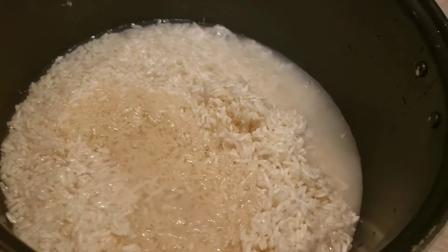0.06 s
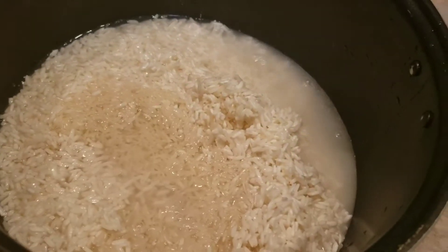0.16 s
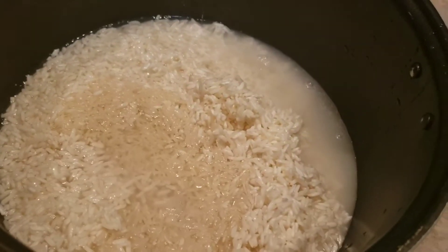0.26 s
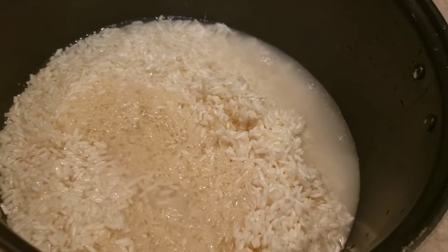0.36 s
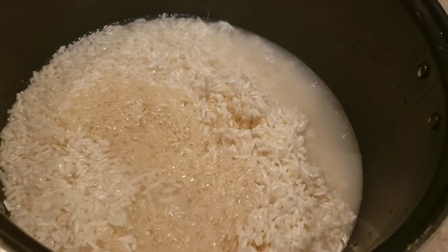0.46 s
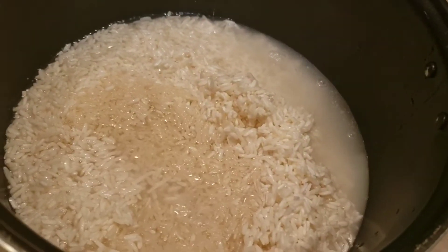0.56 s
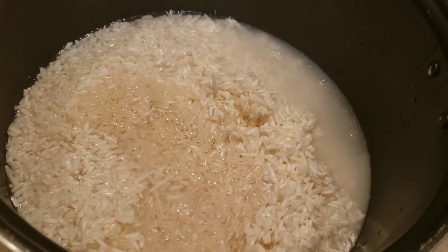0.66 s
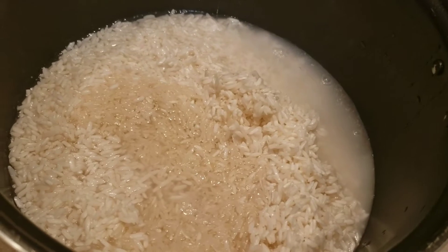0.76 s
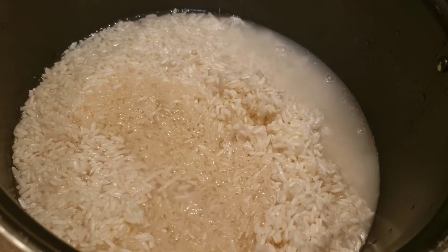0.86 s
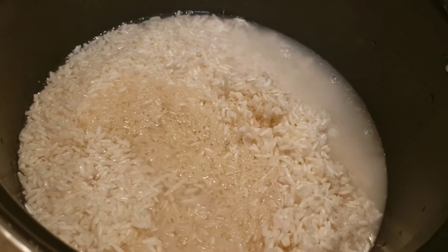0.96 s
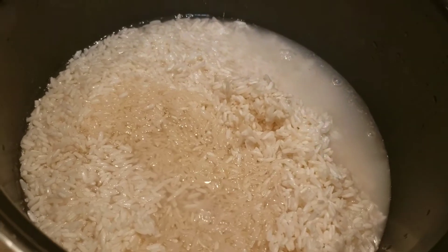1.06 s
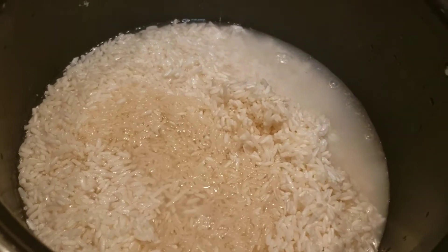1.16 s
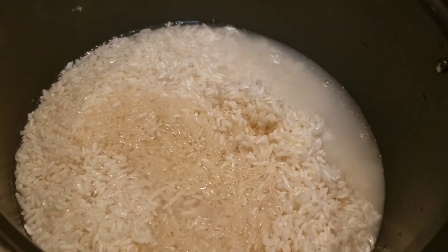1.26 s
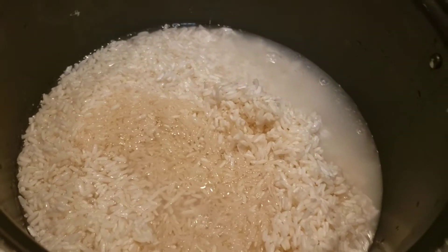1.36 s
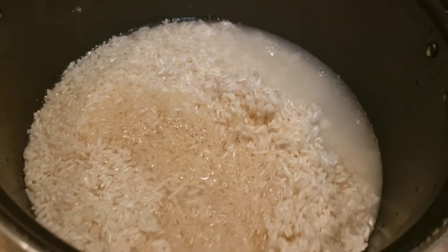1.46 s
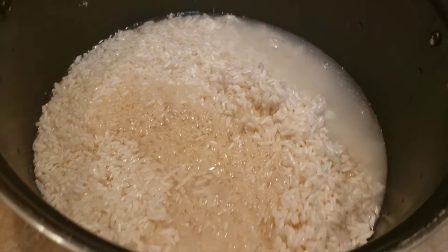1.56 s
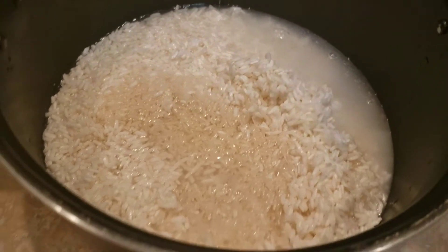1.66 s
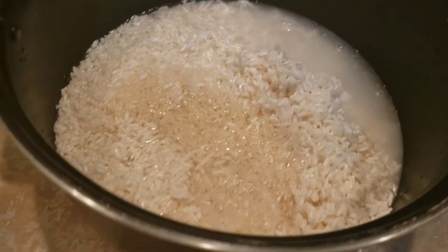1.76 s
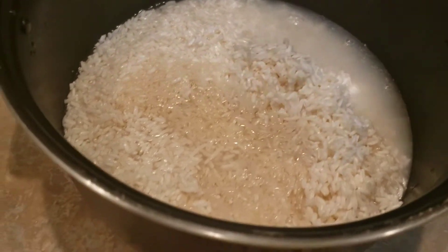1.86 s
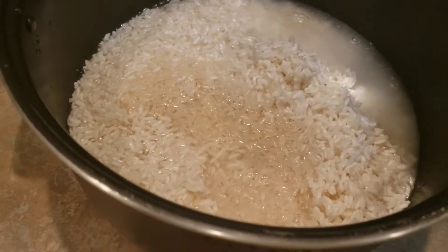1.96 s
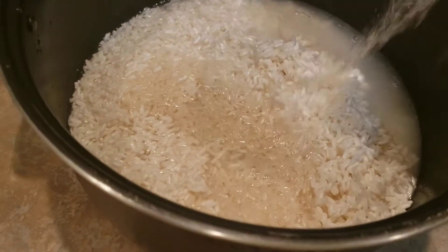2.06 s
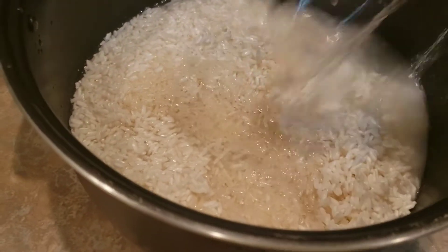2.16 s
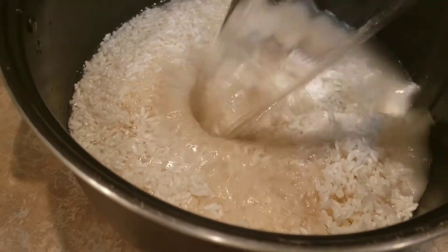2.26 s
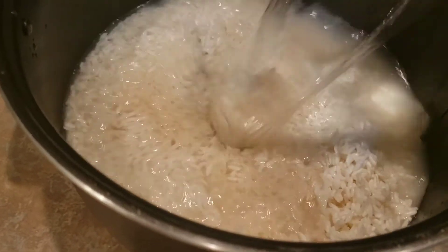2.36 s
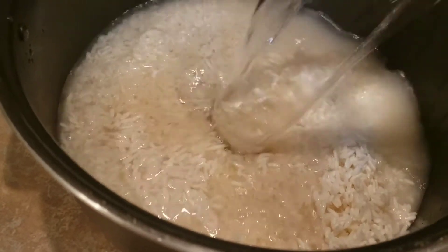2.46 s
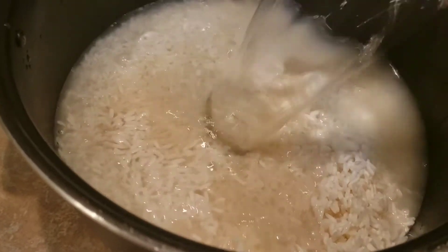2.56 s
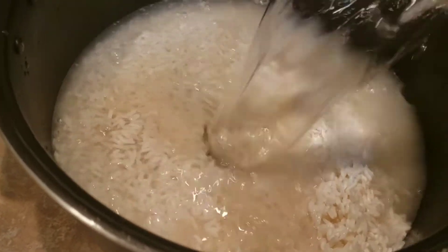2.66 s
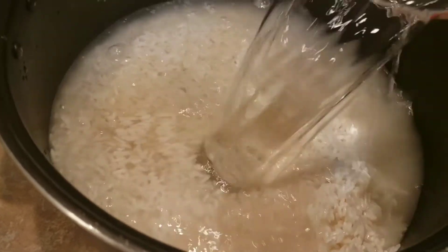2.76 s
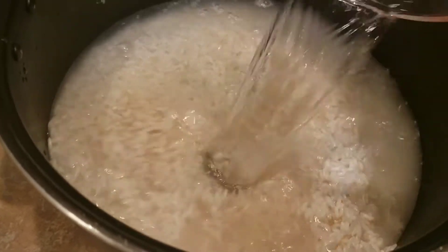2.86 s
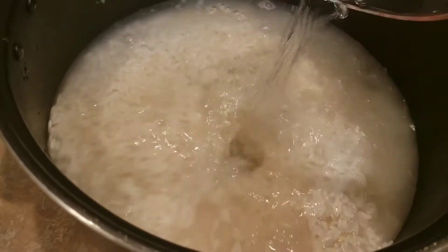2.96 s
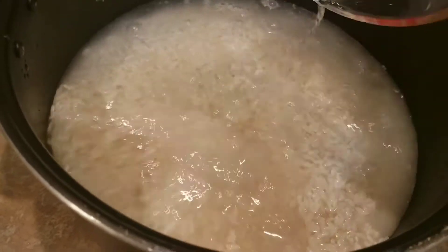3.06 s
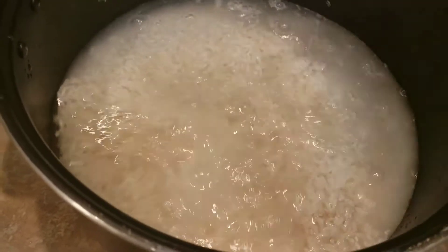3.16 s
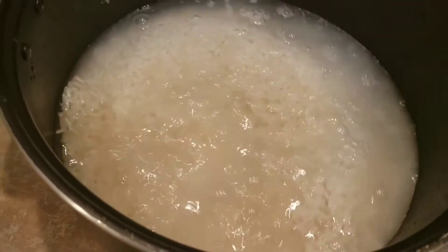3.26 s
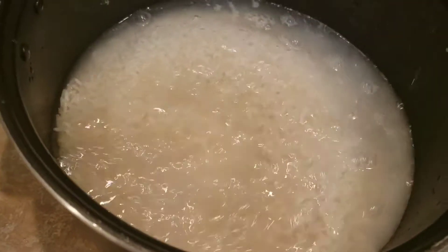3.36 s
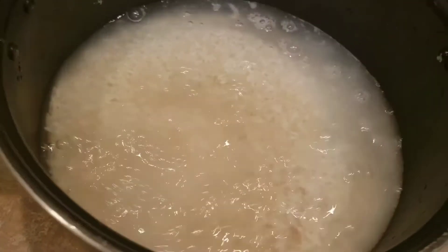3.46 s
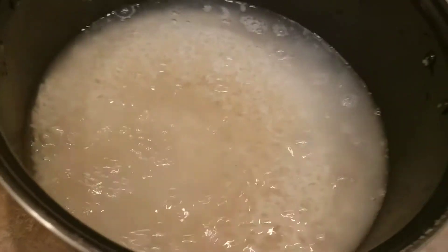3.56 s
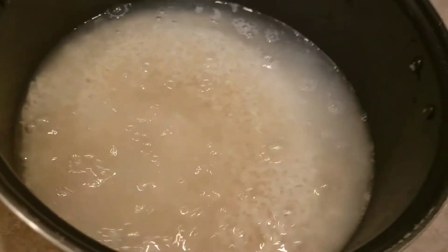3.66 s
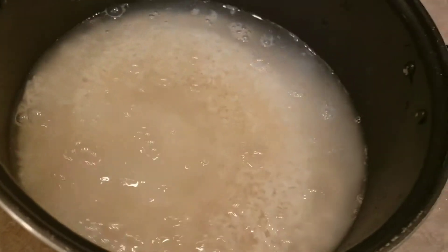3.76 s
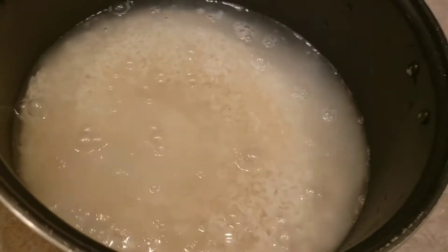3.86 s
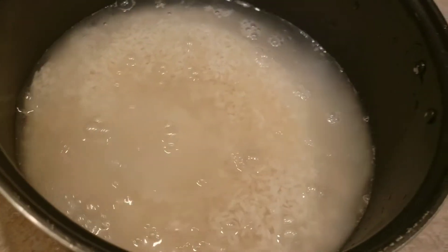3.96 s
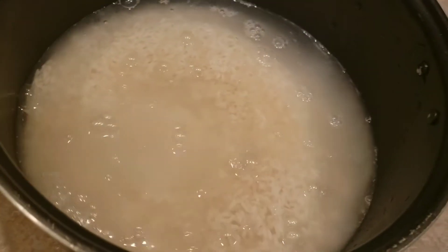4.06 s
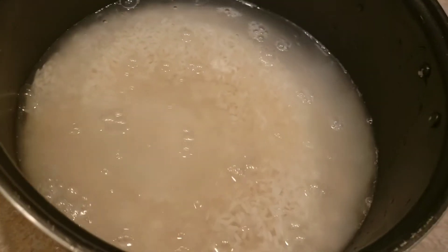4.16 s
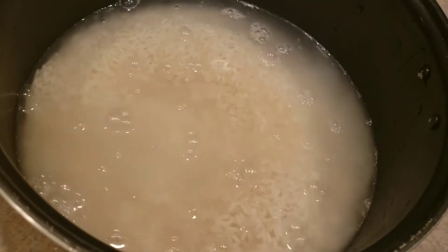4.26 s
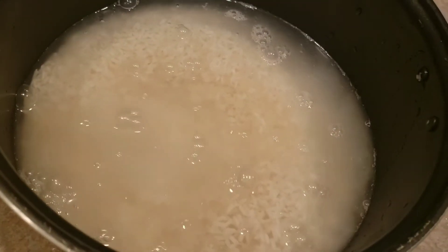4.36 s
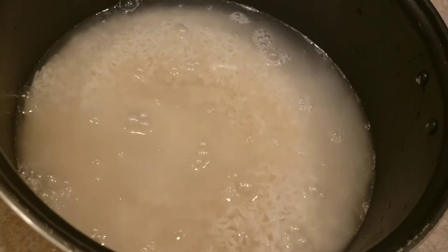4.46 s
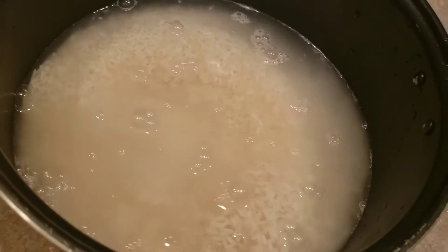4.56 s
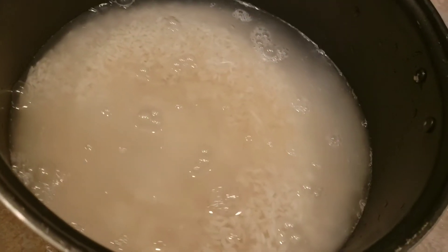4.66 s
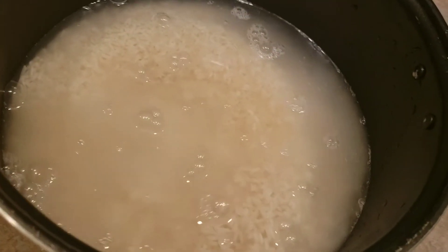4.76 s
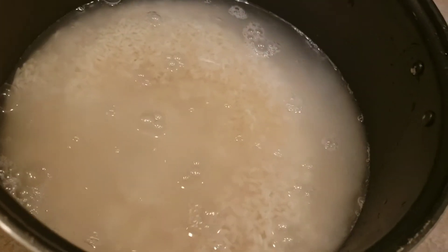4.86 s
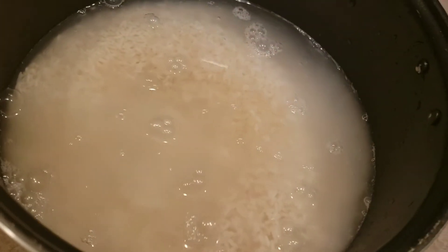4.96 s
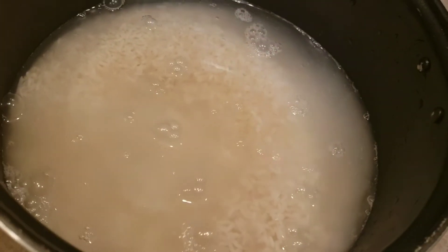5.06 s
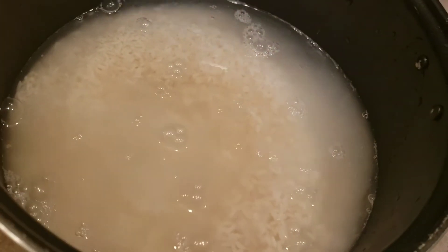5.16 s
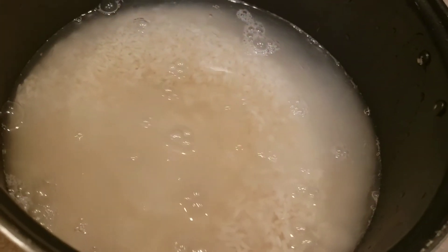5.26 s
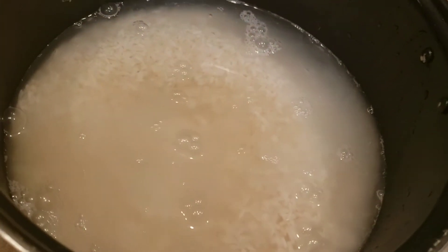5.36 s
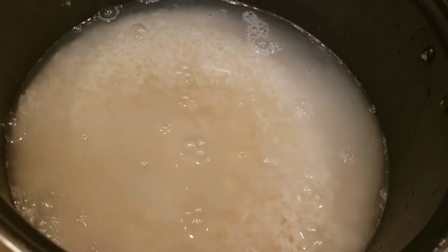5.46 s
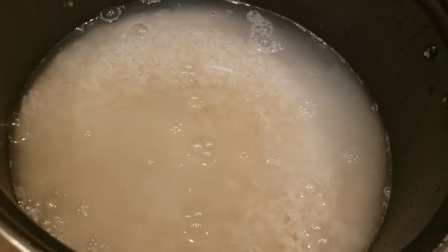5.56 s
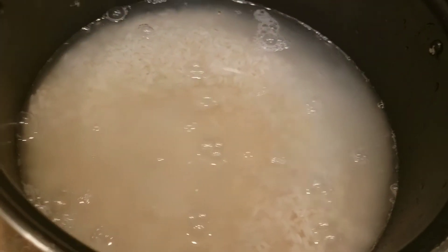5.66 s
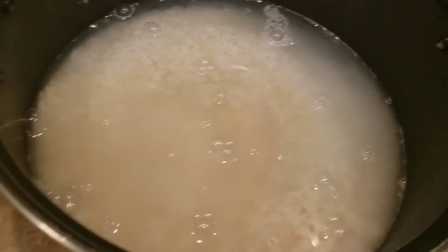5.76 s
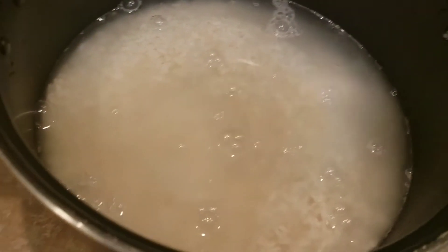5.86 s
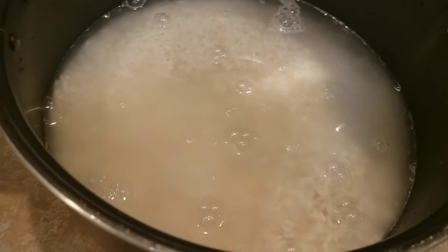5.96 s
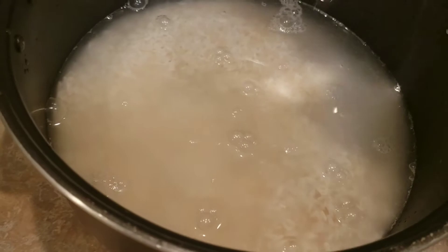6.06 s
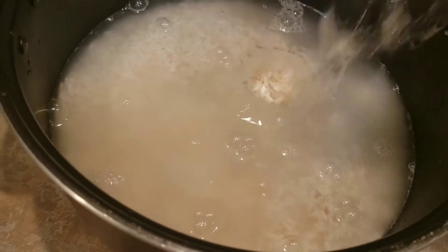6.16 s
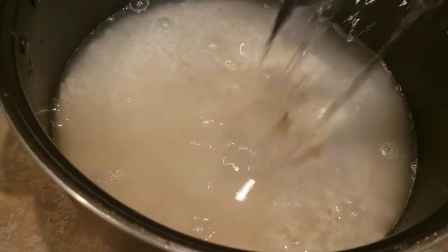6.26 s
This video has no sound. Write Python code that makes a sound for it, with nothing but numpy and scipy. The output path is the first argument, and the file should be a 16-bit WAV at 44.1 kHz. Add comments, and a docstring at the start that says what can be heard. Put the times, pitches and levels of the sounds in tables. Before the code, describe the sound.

Jug thuds and sloshes on the counter, water gushes briefly onto wet rice, fizz fades, more thuds, a second pour begins.

```python
"""Water is poured twice from a cup over raw rice in a pot in a small kitchen: many short bubble rings and noise
bursts make it patter, splash and gurgle, and tiny bubbles fizz after the first pour.
Before each pour something heavy, likely a jug of water, bumps down on the counter (decaying sines and noise)
and its water sloshes (bubbles whose loudness swings). A last thud comes just before the second pour.
Low tones hum, wet rice ticks faintly, and the kitchen adds echoes, low rumble and hiss."""
import sys
import numpy as np
from scipy import signal
from scipy.fft import rfft, irfft
from scipy.io import wavfile

SR = 44100
rng = np.random.default_rng(int(sys.argv[2]) if len(sys.argv) > 2 else 0)


def log_audio(samples):
    """Write samples as a 16-bit WAV file to the path given in sys.argv[1]."""
    # one column per channel
    frames = np.atleast_2d(samples).T
    # limit to full scale, then quantise
    limited = np.clip(frames, -1, 1)
    pcm = np.round(limited * 32767).astype(np.int16)
    wavfile.write(sys.argv[1], SR, pcm)


N = 277830   # length of the scene in samples
TIME = np.arange(N) / SR
BRIEF = TIME[:SR // 2]   # time axis of one short hit

# Levels in all tables are those before the later mixing gains; t60 is the time to fade by 60 dB.
# the two pours, thin stream to full flow to stop: (start t/s, full flow t/s, stop t/s, level/dB)
POUR_TIMES = [(2.046, 2.214, 3.03, 0), (6.18, 6.201, 6.4, -4.5)]
# tone colour of the water in the pot: (f/Hz, level per Hz/dB)
SPLASH_COLOUR = [(94, -40.5), (160, -5), (280, -8), (333, -1.5), (605, -9.5), (777, -3), (1440, -10),
                 (1680, -4), (1850, -14), (2240, -4), (3700, -8.5), (5230, -2), (7260, -2), (8800, -14.5),
                 (16000, -3.5)]


def from_db(db):
    """Turn decibels into a gain."""
    return 10 ** (np.asarray(db) / 20)


def rms(x):
    """Root mean square: the effective strength of a sound."""
    return np.sqrt(np.mean(x ** 2) + 1e-20)


def at_hz(points, hz):
    """Read a curve between its points, on a log-frequency axis."""
    f, value = np.transpose(points)
    return np.interp(np.log(hz + 1e-3), np.log(f), value)


def since(s):
    """Seconds gone by since a moment, zero before it."""
    return np.maximum(TIME - s, 0)


def add(out, s, sound):
    """Mix a sound in, starting at s seconds."""
    i = int(s * SR)
    out[..., i:i + sound.shape[-1]] += sound[..., :N - i]


def at_level(x, db):
    """Scale a hit so that its first 20 ms have this level."""
    return x * from_db(db) / rms(x[..., :SR // 50])


def band(x, low_hz, high_hz, order=2):
    """Keep only the sound between two frequencies."""
    edges = [low_hz, min(high_hz, 0.45 * SR)]
    return signal.sosfilt(signal.butter(order, edges, "band", fs=SR, output="sos"), x + 1e-18)


def colour(x, points, size=4096):
    """Filter with the given spectrum, its response as early as possible (minimum phase)."""
    spectrum = from_db(at_hz(points, np.fft.rfftfreq(size, 1 / SR)))
    cepstrum = irfft(np.log(spectrum))
    one_sided = np.r_[cepstrum[0], 2 * cepstrum[1:size // 2]]   # folding it gives minimum phase
    response = irfft(np.exp(rfft(one_sided, size)))
    return signal.oaconvolve(np.atleast_2d(x), response[None], axes=1)[:, :x.shape[-1]]


def place(x, pan):
    """A direction gives each frequency its own left-right balance."""
    ears = []
    for ear, half in zip(x, (0.5, -0.5)):
        ears.append(colour(ear, [(hz, half * db) for hz, db in pan]))
    return np.vstack(ears)


def left_late(x, lag_s):
    """Sound from the side reaches the left ear later."""
    return np.array([np.interp(TIME - lag_s, TIME, x[0]), x[1]])


def stereo_noise(size, alike):
    """White noise, partly shared by both channels."""
    alike = np.clip(alike, 0, 1)
    shared = np.sqrt(alike) * rng.standard_normal(size)
    return shared + np.sqrt(1 - alike) * rng.standard_normal((2, size))


def drift(rate):
    """Random wandering with a new target this many times a second."""
    return np.interp(TIME * rate, np.arange(2000), rng.standard_normal(2000))


def struck(modes, t):
    """A struck body rings as decaying sines, with slightly different strengths at each blow."""
    out = 0
    for hz, db, t60 in modes:
        out = out + from_db(db + rng.normal(0, 1) - 60 * t / t60) * np.sin(2 * np.pi * hz * t)
    return out


def grains(per_s, spread_db, cycles, low_hz, high_hz, count=20):
    """Random tiny bubbles ring a few cycles, each at one of several pitches; even power per Hz."""
    out = np.zeros((2, N))
    born = np.flatnonzero(rng.random(N) < per_s * from_db(3 * drift(40)) / SR)
    sizes = from_db(spread_db * np.minimum(rng.exponential(1, N), 4)) * rng.choice([-1, 1], N)
    ears = 1 + 0.57 * rng.standard_normal((2, N))   # each bubble has its own place
    dealt = rng.integers(0, count, N)   # and its own pitch
    for k, hz in enumerate(np.geomspace(low_hz, high_hz, count)):
        at = born[dealt[born] == k]
        clicks = np.full((2, N), 1e-18)
        clicks[:, at] = sizes[at] * ears[:, at]
        # a resonator turns each click into a fading ring
        r = from_db(-60 * hz / (cycles * SR))
        w = 2 * np.pi * hz / SR
        rings = signal.lfilter([1, 0, -1], [1, -2 * r * np.cos(w), r * r], clicks)
        out += np.sqrt(hz) * rings / rms(rings)
    return out


def bubbles(rows, swell_s):
    """A trapped bubble swells, rings and glides up in pitch as it nears the surface."""
    out, t = np.zeros((2, N)), TIME[:SR // 6]
    for s, db, hz, t60, climb in rows:
        pitch = hz * (1 + climb * np.minimum(t / t60, 1))
        shape = (1 - np.exp(-t / swell_s)) * from_db(-60 * t / t60)
        ring = np.sin(2 * np.pi * np.cumsum(pitch) / SR)
        add(out, s, from_db(db) * shape / shape.max() * ring)
    return out


def blips(loudness, low_hz, high_hz, cycles, spread_db, count):
    """Clear-ringing bubbles, born more often and louder the harder the stream runs."""
    chance = np.sqrt(loudness)
    at = rng.choice(N, count, p=chance / chance.sum())
    size, strength, climb = rng.random((3, count))
    hz = low_hz * (high_hz / low_hz) ** size
    db = 20 * np.log10(loudness[at]) - spread_db * strength
    return bubbles(zip(at / SR, db, hz, cycles / hz, climb / 10), swell_s=0.00037)


def splats(rows, width, skirt_db):
    """Water hits a surface: a short noisy spray of droplets round one pitch, plus a wider skirt."""
    out = np.zeros((2, N))
    for s, db, hz, decay in rows:
        spray = stereo_noise(len(BRIEF), 0.29) * np.exp(-BRIEF / decay)
        centre = band(spray, hz / (1 + width), hz * (1 + width))
        skirt = from_db(skirt_db) * band(spray, 3000, 4400, order=1)
        add(out, s, at_level(centre + skirt, db))
    return out


def background():
    """Low appliance rumble and a faint hiss: coloured noise, more alike in both ears at low pitch."""
    # background spectrum: (f/Hz, level per Hz/dB)
    floor = [(15, -46), (25, -26.5), (44, -4), (92, -7), (130, -1.5), (200, -12.5), (229, -6), (263, -15),
             (344, -18), (607, -21.5), (734, -31.5), (4490, -49.5), (6380, -40.5), (11300, -46.5),
             (16000, -31.5)]
    # how alike left and right are: (f/Hz, likeness from 0 to 1)
    likeness = [(100, 0.9), (400, 0.77), (1000, 0.18), (3000, 0.066), (15000, .1)]
    parts = []
    for sign in (1, -1):
        curve = [(hz, 10 * np.log10(max(1 + sign * alike, 1e-3))) for hz, alike in likeness]
        parts.append(colour(rng.standard_normal(N), curve))
    mid, side = parts
    noise = colour(mid + side * [[1], [-1]], floor)
    return from_db(-56) * noise / rms(noise.mean(0))


def soaking():
    """Wet rice ticks faintly as it lets its air go, more softly once it lies under water."""
    ticking_db, submerged_db = -73.5, -1.5   # level in the open, change under water
    _, _, covered, _ = POUR_TIMES[0]
    ticks = grains(per_s=57, spread_db=4.5, cycles=9.6, low_hz=7220, high_hz=15000, count=8)
    ticks = colour(ticks, SPLASH_COLOUR)
    return from_db(ticking_db + submerged_db * (TIME > covered)) * ticks / rms(ticks)


def pot_walls(x, t60, echo_db, count=4):
    """Sound bounces between the steel walls; a few echo patterns trade places at random."""
    t, out = TIME[:SR // 8], x
    shares = np.array([drift(9) for _ in range(count)])
    for share in shares / np.sqrt(np.sum(shares ** 2, axis=0)):
        echoes = stereo_noise(len(t), 0.24) * from_db(-60 * t / t60) * (t > 0.0006)
        echoes = band(echoes / np.sqrt(np.sum(echoes[0] ** 2)), 1200, 6700, order=1)
        out = out + from_db(echo_db) * signal.oaconvolve(share * x, echoes, axes=1)[:, :N]
    return out


def kitchen(x):
    """Diffuse echoes from hard walls: bands of noise, each dying at its own rate."""
    # fade time of the echoes: (f/Hz, t60/s)
    room_t60 = [(100, 0.45), (300, 0.38), (1000, 0.56), (3000, 0.5), (7000, 0.42), (15000, 0.23)]
    # strength of the echoes: (f/Hz, level/dB)
    room_gain = [(60, -14), (250, 1), (600, -3), (1500, -6.5), (3000, -4.5), (7000, -6), (15000, 1.5)]
    t, response = TIME[:SR], 0
    edges = 50 * 2 ** np.arange(0, 9, 0.6)
    white = rng.standard_normal((2, 3, SR))
    for k, (low, high) in enumerate(zip(edges, edges[1:])):
        hz = np.sqrt(low * high)
        shared = 1 / (1 + (hz / 700) ** 2)   # long waves reach both ears alike
        noise = np.sqrt(shared) * white[k % 2, 0] + np.sqrt(1 - shared) * white[k % 2, 1:]
        fade = from_db(at_hz(room_gain, hz) - 60 * t / at_hz(room_t60, hz))
        response = response + band(noise, low, high) * fade
    response = response * (1 - np.exp(-t / 0.002)) / np.sqrt(SR / 25)
    return signal.fftconvolve(x, response, axes=1)[:, :N]


def rocking():
    """Gain of the wash in the jug: it swells on every swing, fades, then settles."""
    # spells of rocking water: (t/s, level/dB, fade/dB per s, length/s)
    sloshes = [(0.608, -37, 13, 0.35), (4.554, -26.5, 39, 0.87)]
    period_s, depth_db, settle_db_per_s = 0.188, 7.5, 97
    out = 0
    for s, db, fade, length in sloshes:
        trough = np.sin(np.pi * since(s) / period_s) ** 2
        level_db = db - fade * since(s) - depth_db * trough - settle_db_per_s * since(s + length)
        out = out + (TIME > s) * from_db(level_db)
    return out


def jug():
    """Water rocks, laps and glugs in the jug: swinging bubble noise, wall splats and rising bubbles."""
    # tone colour of the rocking water: (f/Hz, level per Hz/dB)
    slosh_colour = [(240, -49.5), (400, -17.5), (616, -10.5), (765, -16), (921, -15.5), (1110, -15.5),
                    (2930, -9.5), (3640, -15), (5780, -10), (8500, -35), (16000, -24)]
    # trapped air glugging upward in pitch: (t/s, peak level/dB, starting f/Hz)
    glug_rows = [(0.732, -27.5, 840), (0.744, -28.5, 1280), (.795, -35.5, 517), (.828, -33, 1445),
                 (1.168, -29.5, 2936), (4.858, -21.5, 839), (4.86, -27, 1366), (5.272, -30, 1507)]
    # laps against the jug's wall: (t/s, level/dB, centre f/Hz)
    lap_rows = [(0.271, -33.5, 4860), (0.7795, -29, 5620), (.992, -31.5, 6140), (1.1668, -30.5, 3170),
                (4.8509, -19.5, 4900), (5.069, -32.5, 2870), (5.0923, -23, 4820), (5.1543, -36, 5400),
                (5.241, -23, 4100), (5.2706, -22, 2340)]
    glug_t60_s, glug_climb_hz, lap_decay_s = 0.0463, 630, 0.0074
    wash = grains(per_s=2600, spread_db=-1.0, cycles=20, low_hz=550, high_hz=14050, count=24)
    wash = colour(wash, slosh_colour)
    wash = from_db(-6.0) * rocking() * wash / rms(wash)
    glugs = bubbles([(s, db, hz, glug_t60_s, glug_climb_hz / hz) for s, db, hz in glug_rows], swell_s=0.0032)
    laps = splats([(s, db, hz, lap_decay_s) for s, db, hz in lap_rows], width=0.19, skirt_db=-9.5)
    return wash + from_db(-6) * glugs + from_db(-16.0) * laps


def knocks():
    """The counter thumps, the jug booms and its base crackles as it lands; then it rebounds once."""
    # blows of the jug on the counter; the one at 0.348 s is the bounce of the first landing: (t/s, thump
    # level/dB, boom level/dB, boom f/Hz, clack level/dB, crack level/dB, snap level/dB, contact decay/s,
    # rebound delay/s, rebound level/dB relative to the blow)
    jug_blows = [(0.2975, -33.5, -32, 233, -41, -20, -25, 0.011, .02, -20.5),
                 (0.3479, -15, -24.5, 234.5, -24, -16, -18, 0.0076, 0.039, -11),
                 (.4873, -14, -18, 226.5, -19, -11.5, -13.5, .011, .039, -13),
                 (4.2441, -23.5, -26, 241, -29.5, -22, -24, 0.027, 0.025, -1.5),
                 (4.4581, -13.5, -17.5, 233, -20.5, -16, -18.5, 0.011, .029, -9),
                 (4.5832, -16.5, -24.5, 246, -20.5, -13, -17.5, 0.014, 0.032, -6.5),
                 (6.1292, -25, -31.5, 367.6, -32.5, -30.5, -28.5, 0.0042, 0.044, -19.5)]
    # the counter top: (f/Hz, level/dB, t60/s)
    thump = [(71, -7, 0.2), (89, -0.5, 0.25), (116.4, 4.5, 0.25), (155, -10.5, 0.081)]
    # the jug's belly: (multiple of the boom f, level/dB, t60/s)
    boom = [(.82, -11, .22), (.96, -2, .12), (1.05, 0, .12), (1.45, -13, .07)]
    # the jug's walls: (f/Hz, level/dB, t60/s)
    wall_modes = [(393, -11.5, 0.071), (525, -12.5, 0.078), (579, -5.5, 0.27), (610.3, -4, 0.15),
                  (812, -6, 0.12), (964, -16, 0.078), (1182, -5.5, 0.13), (1333, -13.5, .1),
                  (1455, -13, .09), (1650, -11, 0.096)]
    # tone colour of the crackling base: (f/Hz, level per Hz/dB)
    crack_colour = [(1500, -9), (2200, 3), (2700, 7.5), (3800, 4), (5500, 3), (7200, -3), (8800, -20),
                    (14000, -16.5), (16000, -19)]
    clack_cycles = 17   # top of the clack, in cycles per contact decay: a longer contact is duller
    rebound_softer_db = -2.5   # a rebound cracks less than the landing
    out = np.zeros((2, N))
    heave = 1 - np.exp(-BRIEF / 0.00097)   # heavy parts take a moment to get moving
    for (s, thump_db, boom_db, boom_hz, clack_db, crack_db, snap_db,
         decay, rebound_s, rebound_db) in jug_blows:
        clack_top_hz = np.clip(clack_cycles / decay, 600, 1800)
        blows = ((s, 0, 0), (s + rebound_s, rebound_db, rebound_softer_db))
        for at, blow_db, soft_db in blows:
            contact = stereo_noise(len(BRIEF), 0.25) * (1 - np.exp(-BRIEF / 0.002)) * np.exp(-BRIEF / decay)
            crackle = colour(contact, crack_colour)
            belly = struck([(ratio * boom_hz, db, t60) for ratio, db, t60 in boom], BRIEF)
            body = at_level(heave * struck(thump, BRIEF), thump_db - 7.5)
            body = body - at_level(heave * belly, boom_db - 2.5)
            # the shifting water detunes the walls from blow to blow
            detuned = [(hz * (1 + 0.0096 * rng.normal()), db, t60) for hz, db, t60 in wall_modes]
            clack = at_level(struck(detuned, BRIEF), clack_db - 7.0)
            clack = clack + at_level(band(contact, 320, clack_top_hz), clack_db - 3.5)
            crack = at_level(band(crackle, 1800, 3300), crack_db - 4.0)
            crack = crack + at_level(band(crackle, 4000, 0.45 * SR), snap_db - 2.5)
            add(out, at, from_db(blow_db) * (clack + from_db(soft_db) * crack))
            add(out, at + 0.00081, from_db(blow_db) * band(body, 52, 900, order=3))
    return out


def hums():
    """Low hums ring on around the knocks and as the jug is lifted: slowly swelling, decaying sines."""
    # low hums: (t/s, f/Hz, level/dB, t60/s)
    hum_rows = [(0.299, 232.6, -22.5, .3), (.495, 72, -25, 0.72), (0.496, 116.4, -19.5, .25),
                (.79, 230.6, -49, 8), (4.251, 231.4, -33.5, 2), (4.25, 434, -40, 0.62),
                (4.585, 188.6, -36.5, 1), (4.587, 117.7, -28.5, .53)]
    swell_cycles = 3   # a hum builds up over about this many cycles
    out = np.zeros((2, N))
    for s, hz, db, t60 in hum_rows:
        swell = 1 - np.exp(-TIME * hz / swell_cycles)
        add(out, s, swell * struck([(hz, db, t60)], TIME))
    return out


def pot_air(x):
    """The air above the rice favours a few pitches."""
    # air resonances: (f/Hz, width/Hz, level at the peak/dB)
    resonances = [(340, 47, 2), (777, 34, 0.5), (990, 66, 0), (1660, 100, -1), (2270, 120, 2.5)]
    out = x
    for hz, width, db in resonances:
        out = out + (from_db(db) - 1) * signal.lfilter(*signal.iirpeak(hz, hz / width, SR), x)
    return out


def stream(thin_db, full_db, runoff_db, fade, gulp_share):
    """Gain of one voice: a thin stream, then full with surging gulps, then running off through the rice."""
    # the full stream drags gulps of air under: (t/s, surge level/dB)
    gulps = [(2.297, 11.5), (2.376, 7), (2.464, 11), (2.586, 9.5), (2.719, 7.5), (2.871, 5), (2.936, 7),
             (2.993, 10)]
    gulp_rise_s, gulp_fall_s = 0.008, 0.04
    attack_s, opens_s, release_db_per_s = 0.0034, 0.04, 140
    surge_db = 0
    for s, db in gulps:
        rise = np.minimum(since(s - gulp_rise_s) / gulp_rise_s, 1)
        surge_db = surge_db + db * rise * np.exp(-since(s) / gulp_fall_s)
    wobble_db = 1.5 * drift(35)   # the stream wobbles as it falls
    out = 0
    for start, full, stop, db in POUR_TIMES:
        opened = np.minimum(since(full) / opens_s, 1)
        flow_db = thin_db + (full_db - thin_db) * opened + gulp_share * surge_db + wobble_db
        falling = from_db(flow_db - release_db_per_s * since(stop))
        runoff = opened * from_db(runoff_db - fade * since(stop))
        attack = np.minimum(since(start) / attack_s, 1)
        out = out + from_db(db) * attack * np.maximum(falling, runoff)
    return out


def pour():
    """Big bubbles gurgle, small ones splash, spray patters on the grains; plops and slaps stand out."""
    # large air pockets ringing under the stream: (t/s, peak level/dB, starting f/Hz)
    plop_rows = [(2.288, -20, 1632), (2.296, -25.5, 424), (2.373, -28, 2590), (2.38, -30.5, 550),
                 (2.457, -32, 2357), (2.504, -33, 1080), (2.588, -29.5, 854), (2.686, -32, 1660),
                 (2.72, -31, 1660), (2.866, -30, 2085), (2.966, -27.5, 2086), (2.996, -25, 2190)]
    # slaps of water on the rice: (t/s, level/dB, centre f/Hz)
    slap_rows = [(1.974, -42, 4580), (2.0427, -32.5, 3900), (2.1511, -27.5, 2360), (2.254, -16, 5650),
                 (2.3334, -19, 5400), (2.3767, -24, 7430), (2.6504, -29, 5030), (2.9589, -16.5, 4840),
                 (3.0651, -21, 2560), (3.111, -32, 6100), (6.1814, -28.5, 2460), (6.223, -20.5, 2470),
                 (6.2386, -24.5, 4660)]
    # three voices of the stream, each: (thin stream level/dB, full flow level/dB, running off level/dB,
    # run-off fade/dB per s, share of each gulp)
    gurgle_voice = (-68, -47.5, -55.5, 43.5, 1.0)
    splash_voice = (-49, -45, -53, 55, 0.05)
    spray_voice = (-44, -40.5, -51.5, 27.5, 0.41)
    plop_t60_s, plop_climb = 0.032, 0.11   # climb: share by which the pitch rises
    # a slap of typical level has this decay; one harder by halves_db is half as long
    slap_decay_s, typical_db, halves_db = 0.0046, -17.5, 10.5

    gurgle = pot_air(grains(per_s=1000, spread_db=0.5, cycles=10.0, low_hz=187, high_hz=1310, count=14))
    splash = pot_air(grains(per_s=1300, spread_db=0.0, cycles=14.8, low_hz=1460, high_hz=3690, count=14))
    spray = grains(per_s=7000, spread_db=2.5, cycles=21, low_hz=4100, high_hz=15800, count=18)
    plops = bubbles([(s, db, hz, plop_t60_s, plop_climb) for s, db, hz in plop_rows], swell_s=0.0016)
    timed_slaps = [(s, db, hz, slap_decay_s * 2 ** ((typical_db - db) / halves_db)) for s, db, hz in slap_rows]
    slaps = splats(timed_slaps, width=0.31, skirt_db=-4.0)
    out = from_db(-0.5) * plops + from_db(-12.5) * slaps

    gurgling, splashing, spraying = stream(*gurgle_voice), stream(*splash_voice), stream(*spray_voice)
    for layer, gain in ((gurgle, gurgling), (splash, splashing), (spray, spraying)):
        layer = colour(layer, SPLASH_COLOUR)
        out += gain * layer / rms(layer.mean(0))
    out += blips(from_db(4.0) * gurgling, low_hz=373, high_hz=1395, cycles=13, spread_db=8, count=70)
    out += blips(from_db(2.0) * splashing, low_hz=890, high_hz=4070, cycles=31, spread_db=13.5, count=90)
    out += blips(from_db(5.5) * spraying, low_hz=3670, high_hz=7070, cycles=55, spread_db=14, count=170)
    return out


def fizz(count=700):
    """Tiny bubbles burst after the first pour, rise to a crest, then grow fainter; pitches climb throughout."""
    length_s, crest_s = 0.67, 0.44   # the foam bursts hardest at the crest
    crest_db, fade_db_per_s = -53, 38
    start_hz, octaves_per_s, highest_hz = 2680, 1.4, 15000   # the larger, lower bubbles burst first
    _, _, stop, _ = POUR_TIMES[0]
    age, size, loud = rng.random((count, 3)).T
    age = age * length_s
    lowest_hz = np.minimum(start_hz * 2 ** (octaves_per_s * age), highest_hz)
    hz = lowest_hz * (highest_hz / lowest_hz) ** (size ** 2)
    level = crest_db - fade_db_per_s * np.abs(age - crest_s) - 16 * loud
    return bubbles(zip(stop + age, level, hz, 45 / hz, 0.039 * size), swell_s=0.00038)


def scene():
    """The pot is close by; the jug stands farther off to one side, with more of the room."""
    # balance of sounds from the counter: (f/Hz, left minus right level/dB)
    counter_pan = [(100, -2), (500, 1), (1000, 2.5), (1700, 8), (2600, 5), (4000, 3), (6500, 3.5),
                   (9300, -8.5), (13000, -0.5)]
    # balance of sounds from the pot: (f/Hz, left minus right level/dB)
    pot_pan = [(300, -1), (600, 0.5), (1100, 6), (2500, 9), (4000, 8.5), (6000, 11.5), (8000, 10),
               (9500, -4), (12000, 6), (15000, 13.5)]
    far = knocks() + jug()
    near = from_db(-2.0) * pot_walls(pour() + fizz() + soaking(), t60=0.018, echo_db=-0.5)
    counter = place(left_late(far, lag_s=0.0003) + from_db(0.5) * kitchen(far), counter_pan)
    pot = place(near + from_db(-6.5) * kitchen(near), pot_pan)
    return counter + pot + hums() + background()


def record(dry):
    """Cut the treble steeply above 16 kHz."""
    return signal.sosfilt(signal.ellip(12, 0.1, 80, 16000, fs=SR, output="sos"), dry)


dry = scene()
out = record(dry)
log_audio(out)
```